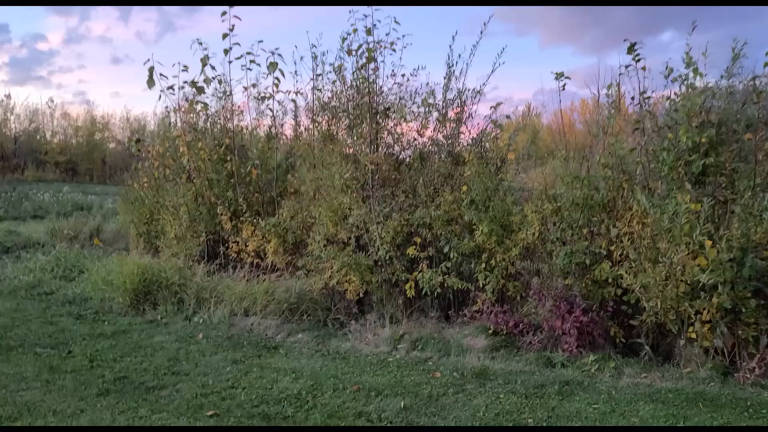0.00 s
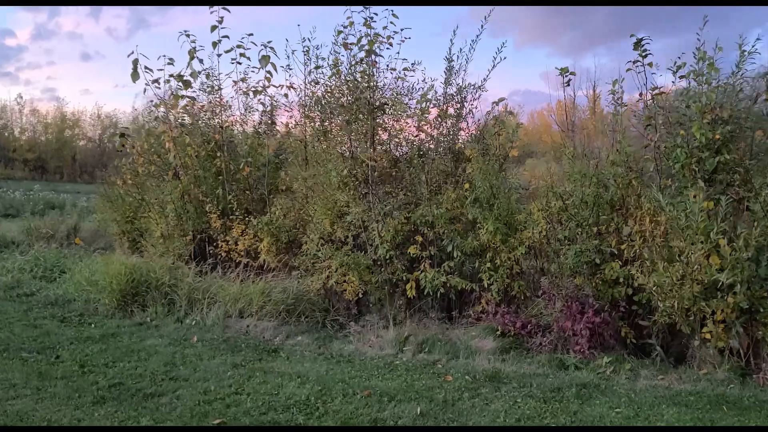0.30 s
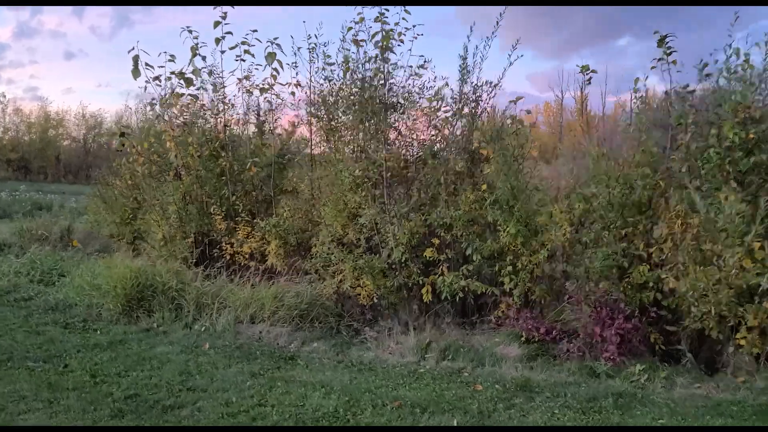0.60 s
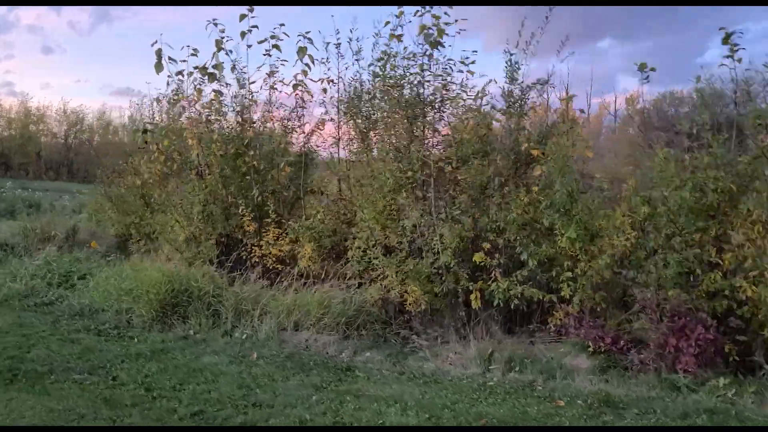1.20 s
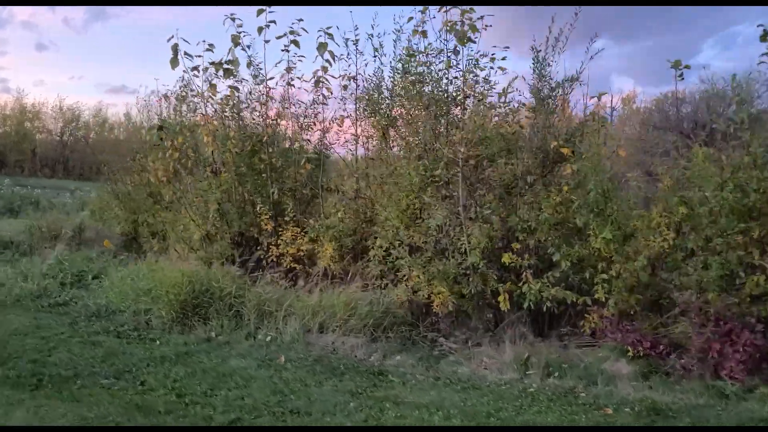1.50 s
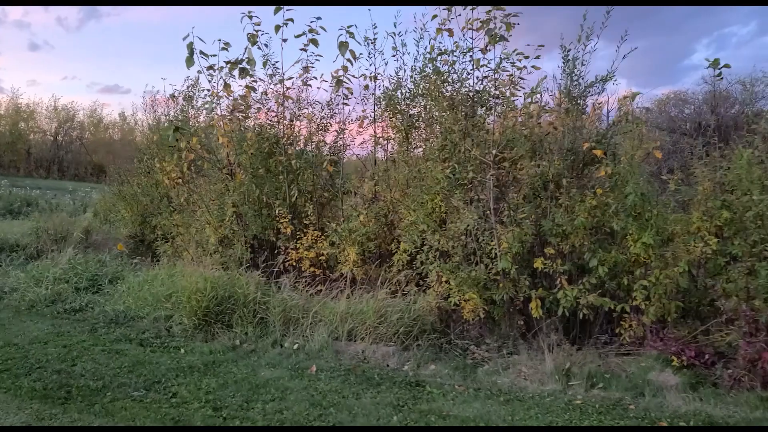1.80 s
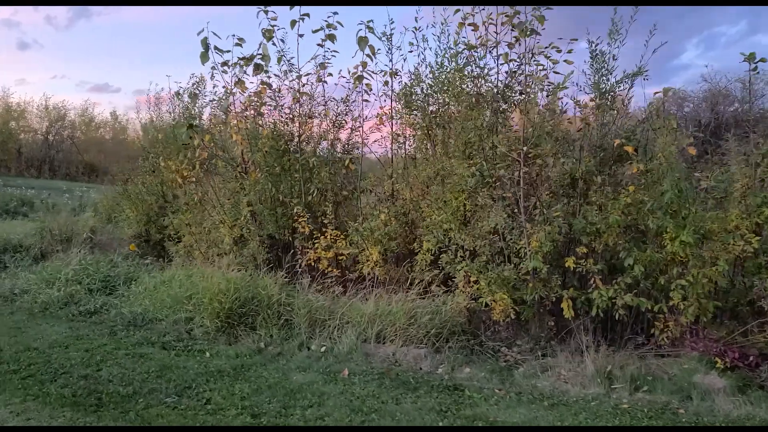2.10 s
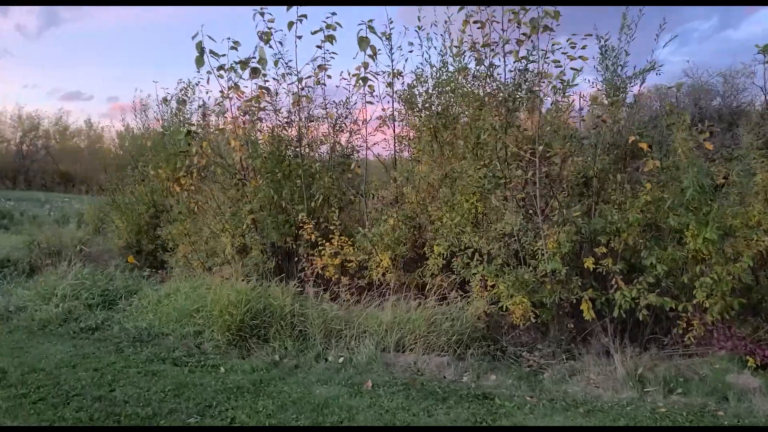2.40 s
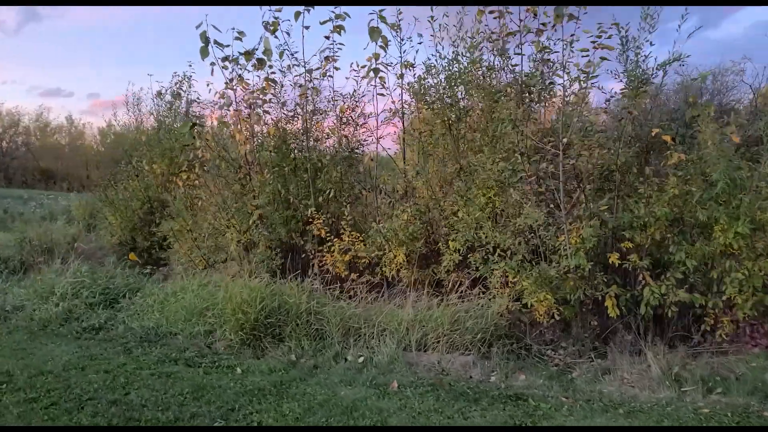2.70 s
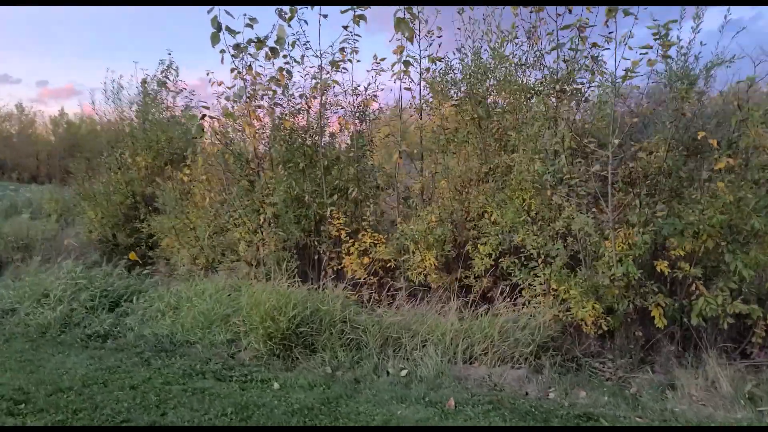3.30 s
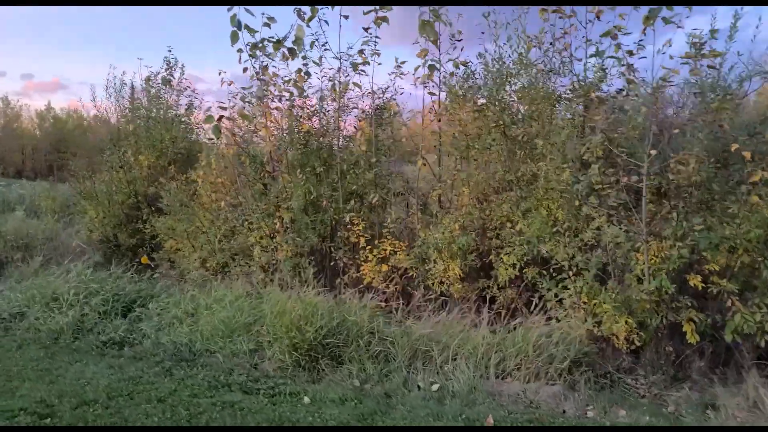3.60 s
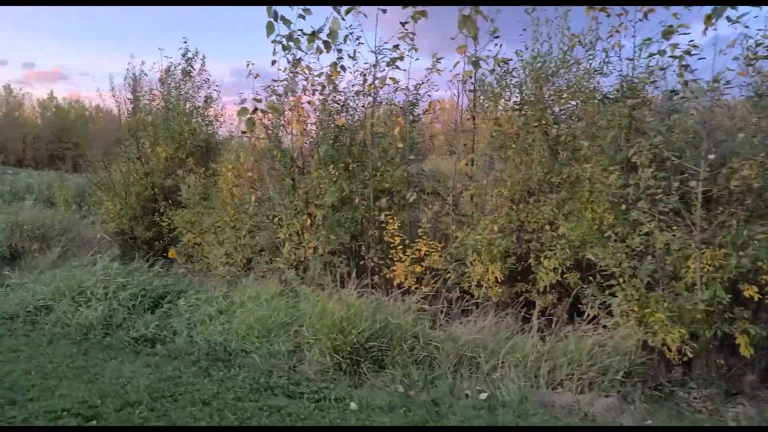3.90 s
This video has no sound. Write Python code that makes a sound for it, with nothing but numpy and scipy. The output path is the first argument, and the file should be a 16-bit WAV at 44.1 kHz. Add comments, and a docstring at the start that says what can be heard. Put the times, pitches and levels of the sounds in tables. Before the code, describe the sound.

Uneven gusts of wind rumble and thump on a hand-held microphone outdoors, shifting between left and right as they build. Faint dry rustling comes and goes in the shrubs, one small knock sounds early, and far traffic hums underneath.

```python
"""Beside shrubs at the edge of a field, in a light evening wind.
Far tyres roar and slowly swell over a low engine hum, while a fine, dry rustle comes and goes.
Early on, a finger knocks once on a hand-held camera, next to its right microphone opening.
The main sound is the wind: gusts and small swirls of air push on both openings, rumbling and thumping."""
import sys
import numpy as np
from scipy import signal
from scipy.fft import rfft, irfft, next_fast_len
from scipy.io import wavfile
from scipy.ndimage import map_coordinates

SR = 44100
rng = np.random.default_rng(int(sys.argv[2]) if len(sys.argv) > 2 else 0)


def log_audio(samples):
    """Write samples as a 16-bit WAV file to the path given in sys.argv[1]."""
    # one column per channel
    frames = np.atleast_2d(samples).T
    # limit to full scale, then quantise
    limited = np.clip(frames, -1, 1)
    pcm = np.round(limited * 32767).astype(np.int16)
    wavfile.write(sys.argv[1], SR, pcm)


N = 176400

# Levels are relative within each table; balance_db is left minus right.
# Tones of the engine, lowest first: pitch_hz, level_db
ENGINE_TONES = [(70.5, -44.5), (141, -70.5), (211.5, -69)]
# Swell of the traffic: time_s, level_db
TRAFFIC_SWELL = [(0.0, -60), (0.2, -60.5), (0.9, -59), (1.49, -58.5), (2.08, -57), (2.68, -55.5),
                 (3.16, -55.5), (4.0, -54)]
# Tone colour of the tyres: pitch_hz, level_db
TYRE_COLOUR = [(60, -9.5), (200, -6.5), (330, -6.5), (480, -2.5), (620, 0.5), (800, 0), (1000, -3.5),
               (1350, -1.5), (1700, -6.5), (2200, -15.5), (3200, -23), (5000, -30), (7000, -37.5),
               (16000, -34)]
# How alike the road sounds on both sides: pitch_hz, likeness (0 to 1)
ROAD_LIKENESS = [(100, 0.9), (400, 1), (750, 0.31), (1300, 0.38), (2200, 0.25), (4400, 0.23), (8000, 0)]
# Rise and fall of the rustle: time_s, level_db
RUSTLE_SWELL = [(0.0, -58.0), (0.15, -66.5), (0.24, -60.5), (0.3, -71.0), (0.39, -62.5), (0.47, -63.5),
                (0.5, -57.5), (0.6, -68.5), (0.68, -59.5), (0.76, -62.5), (0.81, -57.0), (0.86, -66.0),
                (0.98, -63.5), (1.0, -59.0), (1.08, -57.5), (1.12, -66.0), (1.16, -66.0), (1.22, -75.5),
                (1.5, -64.0), (1.52, -70.5), (1.59, -62.5), (1.68, -63.5), (1.77, -75.5), (1.84, -69.5),
                (1.91, -71.0), (1.95, -64.0), (2.16, -68.0), (2.25, -60.5), (2.26, -65.5), (2.34, -63.5),
                (2.36, -70.0), (2.5, -58.5), (2.6, -64.5), (2.8, -70.5), (2.85, -59.0), (2.93, -68.0),
                (2.99, -61.5), (3.02, -68.0), (3.12, -63.5), (3.25, -65.0), (3.36, -75.5), (3.4, -67.0),
                (3.62, -65.5), (3.65, -57.5), (3.76, -69.0), (3.94, -69.0), (3.97, -58.0), (4.0, -64.0)]
# Tone colour of the rustle: pitch_hz, level_db
RUSTLE_COLOUR = [(1200, 3), (2500, -1.5), (4000, -3.5), (5500, -3.5), (7100, -7.5), (8100, -3), (9100, 2),
                 (10300, 1.5), (11800, 3), (14000, -3), (15700, -4.5)]
# The rustle's treble leans left: pitch_hz, balance_db
RUSTLE_BALANCE = [(3000, 0), (6000, 2), (9000, 4), (11500, 2), (15000, 10)]
# Small dry ticks: start_s, level_db
DRY_TICKS = [(1.161, -52), (1.493, -50), (2.332, -40), (2.856, -46), (2.982, -47), (3.587, -48),
             (3.642, -54), (3.968, -52)]
# Tones of the camera's casing: pitch_hz, level_db, fade_s (to fall 60 dB), rise_s
CASING_TONES = [(427, 2.5, 0.017, 0.0027), (740, -11.5, 0.018, .0017), (1250, -3, 0.0074, 0.0017),
                (1710, -22.5, 0.013, 0.0016), (2520, -39, 0.015, 0.00026), (3950, -43.5, 0.01, 0.00038)]
# Gusts on the microphone: time_s, level_db, balance_db
GUSTS = [(0.0, -44, -4), (0.61, -39, 8), (0.7, -50, -7), (0.95, -34.5, -2), (0.99, -46.5, 3),
         (1.34, -41, 22), (1.42, -32.5, -23), (1.65, -33.5, -13), (1.71, -40, 2), (1.8, -30.5, -4),
         (1.86, -50, 6), (1.9, -34, -7), (2.02, -31, -7.0), (2.11, -41.5, -4), (2.37, -32.5, -6),
         (2.44, -28.5, -14), (2.64, -46, -13), (2.67, -38.5, 9), (2.9, -34, 10), (3.0, -32.0, -10),
         (3.08, -33.5, 3), (3.31, -32, -10), (3.44, -40.5, 2), (3.58, -35, -10), (3.65, -25, 14),
         (3.69, -27, 17), (3.74, -40, -13), (3.9, -41, 1.5), (3.95, -28.5, -13), (4.0, -43.5, -6)]
# Tone colour of the gusts: pitch_hz, level_db
GUST_COLOUR = [(15, -17.5), (25, -12.5), (40, -1.5), (65, -2.5), (85, -7.5), (110, -16), (150, -33.5),
               (250, -41), (500, -93)]
# Finer swirls that strong gusts break into: time_s, level_db, balance_db
SWIRLS = [(0.45, -58, -3), (1.21, -62.5, 0), (1.31, -60.5, 11.5), (1.5, -45.5, -13.5), (2.2, -52, -5.0),
          (2.24, -47, -11), (2.72, -62.5, 1), (2.79, -49.5, -9), (2.94, -48, -6), (3.06, -53.5, -9),
          (3.14, -45.5, -16.5), (3.27, -52, -5.5), (3.97, -49, -13), (3.99, -47, -5.5)]
# Tone colour of the swirls: pitch_hz, level_db
SWIRL_COLOUR = [(50, -35), (85, -6.5), (110, -1.5), (150, -10), (220, -19.5), (320, -25.5), (700, -58)]
# Single swirls hitting the microphone: middle_s, level_db, balance_db, pitch_hz
AIR_PUFFS = [(1.445, -26, -8, 63.6), (1.621, -31, -21, 125), (1.704, -25.5, 17, 48.3),
             (1.746, -32, -24, 160), (1.8, -26.5, -10, 69), (1.899, -34, -18, 150), (1.935, -24, -12, 63.5),
             (2.021, -25.5, -6, 60.3), (2.38, -25, 1, 54.5), (3.064, -24, 11, 60), (3.759, -26.5, -20, 111),
             (3.947, -28, -25, 120)]


def amp(db):
    """Turn decibels into a number to multiply by."""
    return 10 ** (np.asarray(db) / 20)


def unit(x):
    """Scale a sound to an average power of 1."""
    return x / np.sqrt(np.mean(x ** 2) + 1e-20)


def along(points, hz):
    """Read between the rows of a table by pitch, on a log scale."""
    pitches, values = np.transpose(points)
    return np.interp(np.log(hz + 1), np.log(pitches + 1), values)


def curves(rows):
    """Give each column after the time one value per sample."""
    times, *columns = np.transpose(rows)
    return [np.interp(np.arange(N) / SR, times, column) for column in columns]


def wobble(per_s):
    """A smooth curve through per_s random points a second."""
    points = rng.standard_normal(int(N * per_s / SR) + 4)
    return map_coordinates(points, [np.arange(N) * per_s / SR])


def filtered(x, response):
    """Multiply each frequency in a sound by response(hz)."""
    size = next_fast_len(N + SR // 2)
    return irfft(rfft(x, size) * response(np.fft.rfftfreq(size, 1 / SR)), size)[..., :N]


def panned(balance_db):
    """Left and right gains that keep the total power the same."""
    gains = amp(np.array([balance_db, -balance_db]) / 2)
    return gains / np.sqrt(np.mean(gains ** 2, axis=0))


def noise(colour):
    """Separate left and right noises with the given tone colour."""
    return unit(filtered(rng.standard_normal((2, N)), lambda hz: amp(along(colour, hz))))


def engine(drift_hz=0.866, waver_db=3):
    """A far engine hums a few low tones that waver on their way through the air."""
    drift_s = np.cumsum(drift_hz * wobble(4.195)) / SR / ENGINE_TONES[0][0]
    t = np.arange(N) / SR + drift_s
    return sum(np.sqrt(2) * amp(db + waver_db * wobble(4.48)) * np.sin(2 * np.pi * hz * t)
               for hz, db in ENGINE_TONES)


def traffic(gain_db=4.5, left_delay_s=0.00028):
    """Tyres roar on a far road to the right, so the sound reaches the left side later."""
    def shares(hz):
        angle = np.arccos(np.clip(along(ROAD_LIKENESS, hz), -1, 1)) / 2
        return np.array([np.cos(angle), np.sin(angle)])

    level_db, = curves(TRAFFIC_SWELL)
    shared, spread = filtered(noise(TYRE_COLOUR), shares)
    left = filtered(shared + spread, lambda hz: np.exp(-2j * np.pi * hz * left_delay_s))
    roar = unit(np.array([left, shared - spread]))
    return roar * amp(gain_db + level_db + 0.42 * wobble(12))


def ticks(rustle_db, crackles_per_s=25, crackle_db=8, fade_s=0.004, pitch_hz=9500, width_hz=4400):
    """Tiny bursts of high noise make a faint random crackle and a few sharper ticks."""
    snaps = (rng.random(N) < crackles_per_s / SR) * amp(rustle_db + crackle_db)
    for start_s, db in DRY_TICKS:
        snaps[round(start_s * SR)] += amp(db)
    fade = amp(-60 * np.arange(SR // 20) / SR / fade_s)
    bursts = noise(RUSTLE_COLOUR) * signal.fftconvolve(snaps, fade)[:N]
    return filtered(bursts, lambda hz: np.exp(-((hz - pitch_hz) / width_hz) ** 2))


def rustle(gain_db=2.43, contrast=1.043, grain_db=1.5, dull_below_hz=7540, wander_db=2.44):
    """Fine, grainy rubbing swells and sinks, dotted with dry ticks."""
    swell_db, = curves(RUSTLE_SWELL)
    level_db = gain_db + swell_db.mean() + contrast * (swell_db - swell_db.mean())
    grains = unit(noise(RUSTLE_COLOUR) * amp(grain_db * wobble(400)))
    rub = grains * amp(level_db + 0.26 * wobble(35))
    dull = filtered(rub, lambda hz: 1 / (1 + (hz / dull_below_hz) ** 8))
    rub = rub - dull + dull * amp(wander_db * wobble(34))  # the duller part wanders on its own
    return filtered(rub + ticks(level_db), lambda hz: panned(along(RUSTLE_BALANCE, hz)))


def knock(start_s=0.3535, gain_db=1.5, left_db=-37, low_cut_hz=315):
    """A soft fingertip makes the casing ring briefly, almost only on the right."""
    t = np.maximum(np.arange(N) / SR - start_s, 0)
    ring = np.zeros(N)
    for hz, db, fade_s, rise_s in CASING_TONES:
        rise = 1 - np.exp(-(t / rise_s) ** 2)
        ring += amp(db - 60 * t / fade_s) * rise * np.sin(2 * np.pi * hz * t)
    low_cut = signal.butter(2, low_cut_hz, "highpass", fs=SR, output="sos")
    ring = signal.sosfilt(low_cut, ring)
    return amp(gain_db) * np.array([amp(left_db) * ring, ring])


def rough_air(rows, colour, flutter_db, per_s):
    """Moving air pushes unevenly, and differently on each microphone opening."""
    level_db, balance_db = curves(rows)
    air = noise(colour)
    flutter = amp(flutter_db * np.array([wobble(per_s), wobble(per_s)]))
    return unit(air * flutter) * amp(level_db) * panned(balance_db)


def puffs(fade_cycles=0.67):
    """Each swirl that breaks gives one short swing of pressure: the deeper, the longer."""
    thumps = np.zeros((2, N))
    for middle_s, db, balance_db, hz in AIR_PUFFS:
        cycles = (np.arange(N) / SR - middle_s) * hz
        swell = amp(db) * np.exp(-(cycles / fade_cycles) ** 2)
        swing = np.sin(2 * np.pi * cycles + rng.uniform(0, 2 * np.pi))
        thumps += panned(balance_db)[:, None] * swell * swing
    return thumps


def wind(gust_gain_db=0.4, swirl_gain_db=3):
    """Gusts rumble on the microphone while finer swirls flutter above them."""
    gusts = rough_air(GUSTS, GUST_COLOUR, flutter_db=0.4, per_s=15)
    swirls = rough_air(SWIRLS, SWIRL_COLOUR, flutter_db=2, per_s=22)
    return amp(gust_gain_db) * gusts + amp(swirl_gain_db) * swirls


def scene():
    """Add up all the sounds, left and right."""
    return wind() + puffs() + engine() + traffic() + rustle() + knock()


def record(dry):
    """The camera cuts off the very highest treble."""
    return filtered(dry, lambda hz: hz < 15780)


dry = scene()
out = record(dry)
log_audio(out)
```